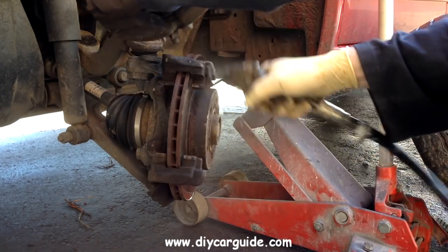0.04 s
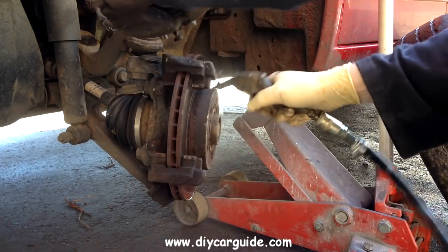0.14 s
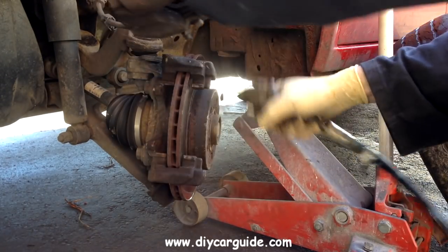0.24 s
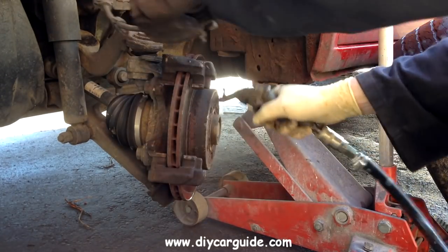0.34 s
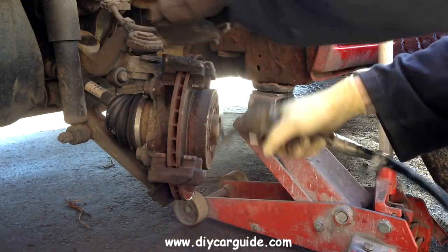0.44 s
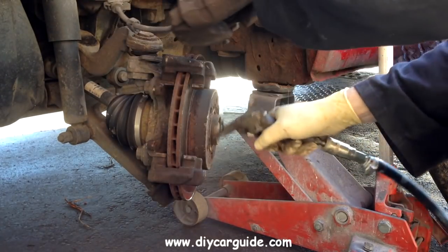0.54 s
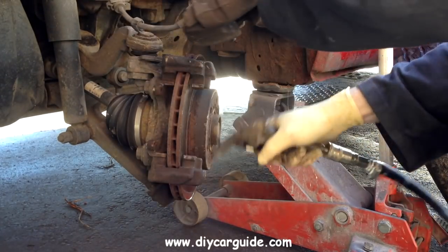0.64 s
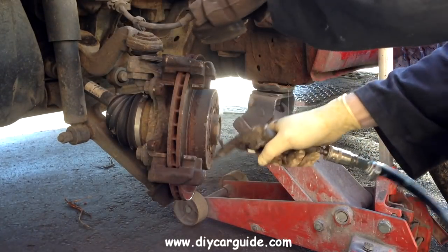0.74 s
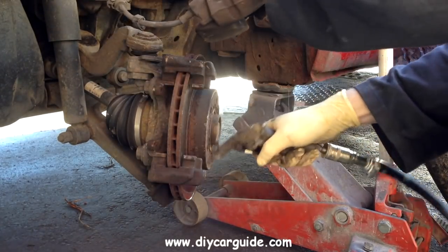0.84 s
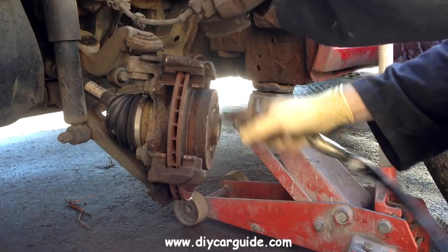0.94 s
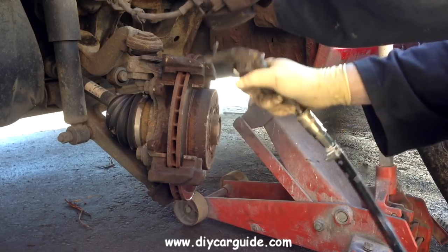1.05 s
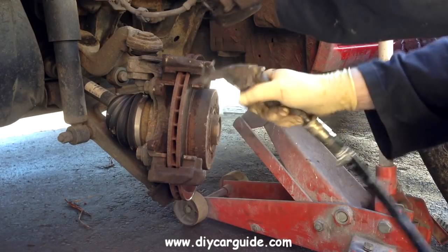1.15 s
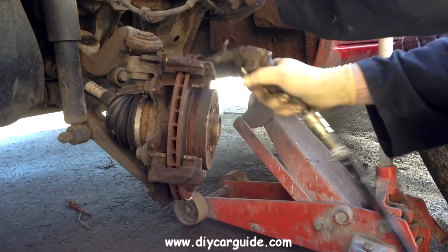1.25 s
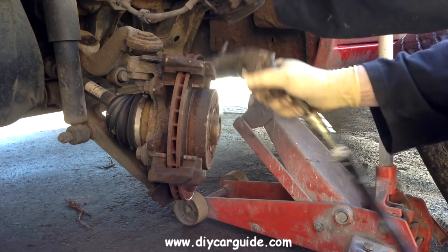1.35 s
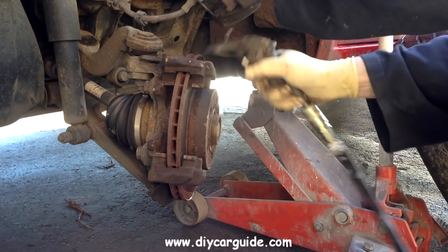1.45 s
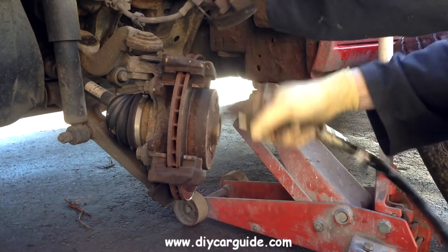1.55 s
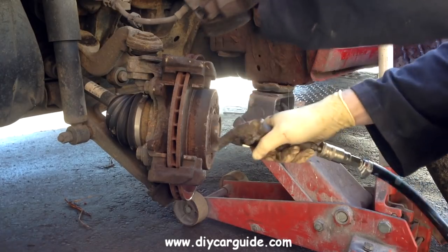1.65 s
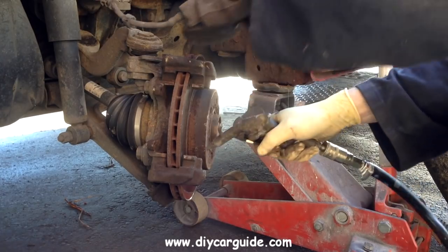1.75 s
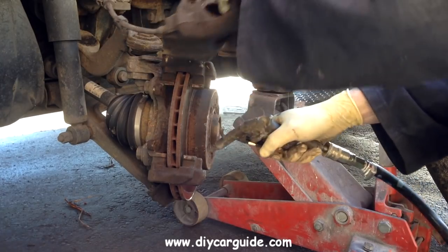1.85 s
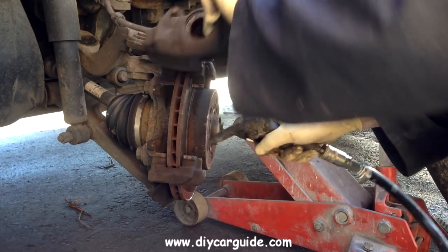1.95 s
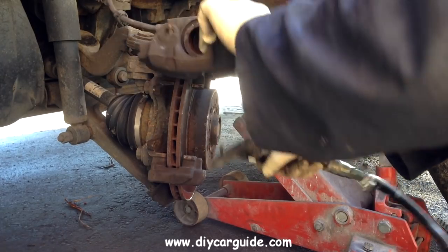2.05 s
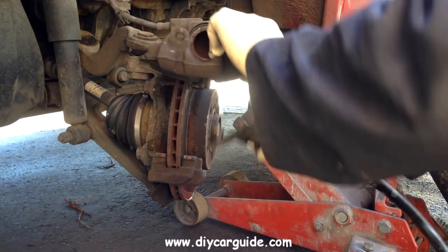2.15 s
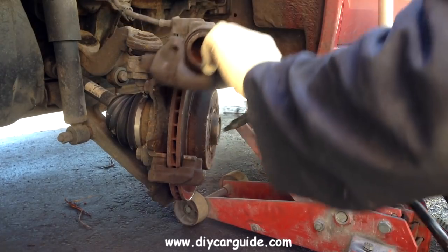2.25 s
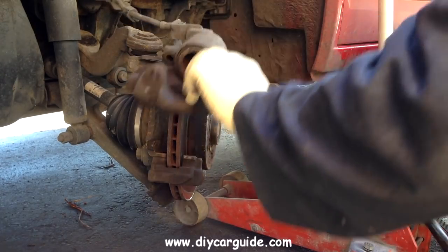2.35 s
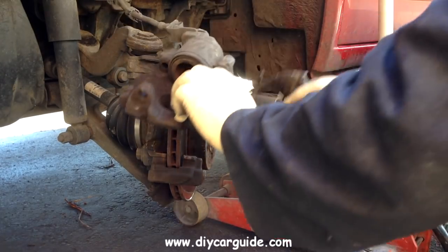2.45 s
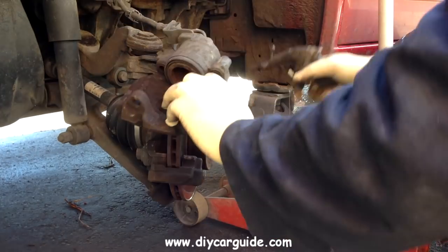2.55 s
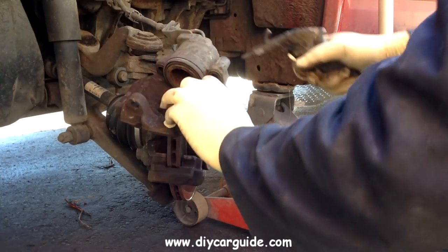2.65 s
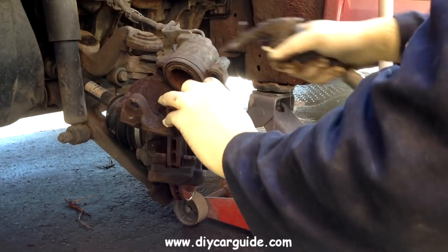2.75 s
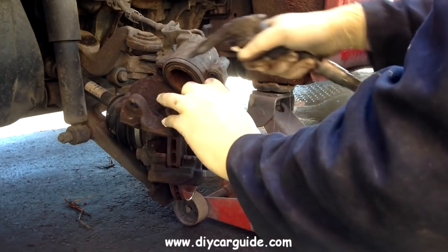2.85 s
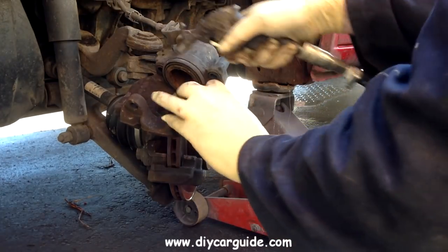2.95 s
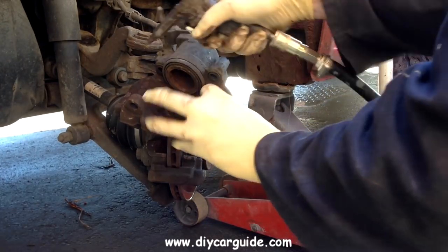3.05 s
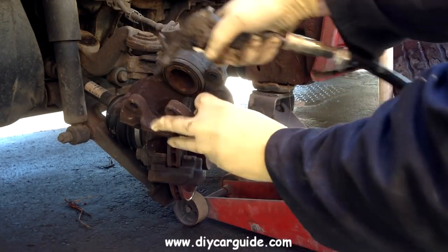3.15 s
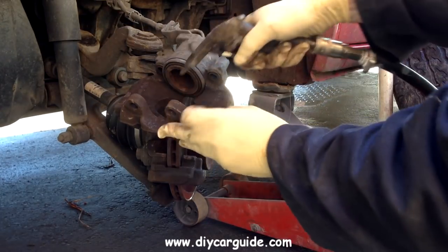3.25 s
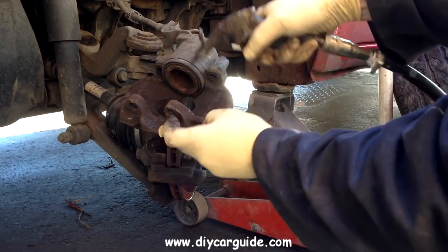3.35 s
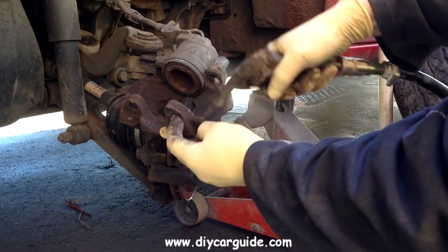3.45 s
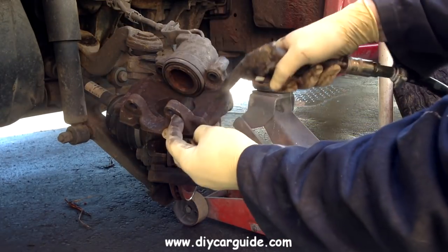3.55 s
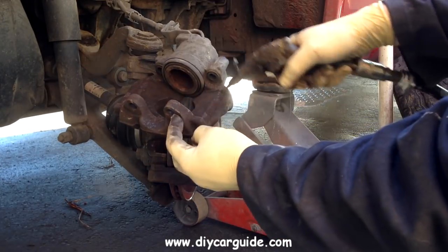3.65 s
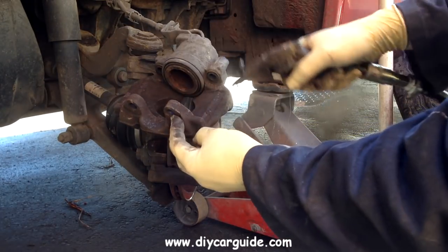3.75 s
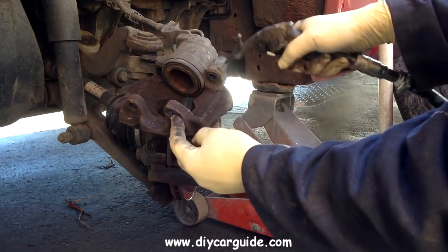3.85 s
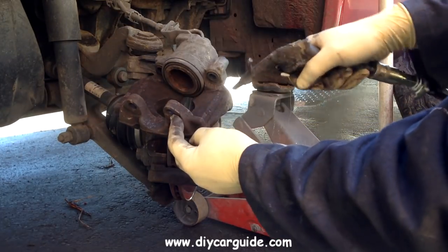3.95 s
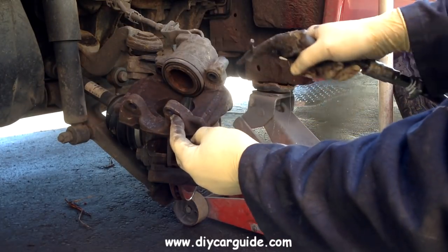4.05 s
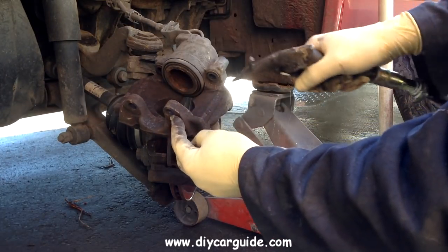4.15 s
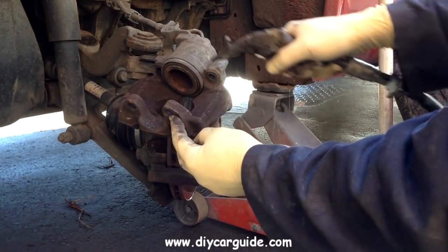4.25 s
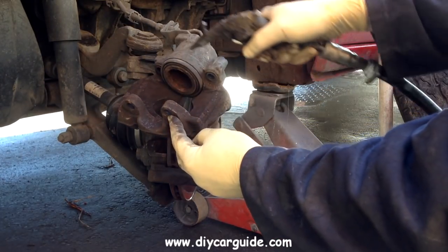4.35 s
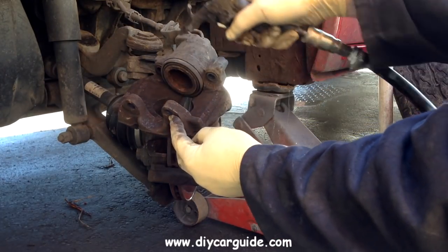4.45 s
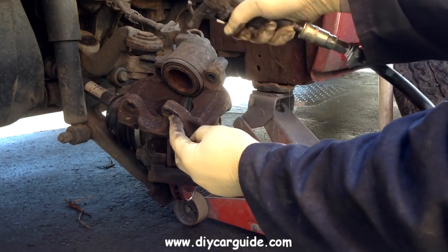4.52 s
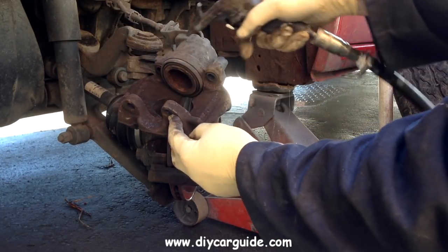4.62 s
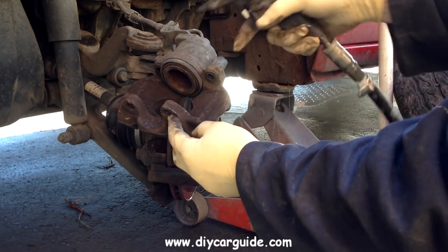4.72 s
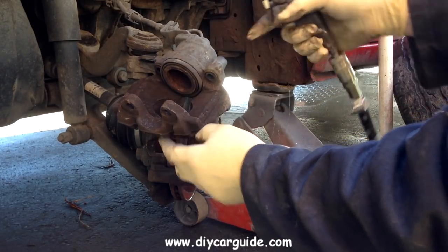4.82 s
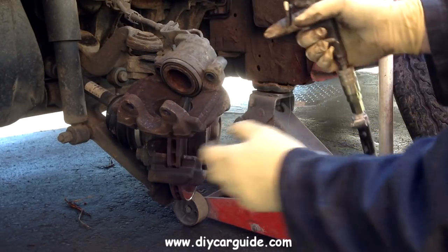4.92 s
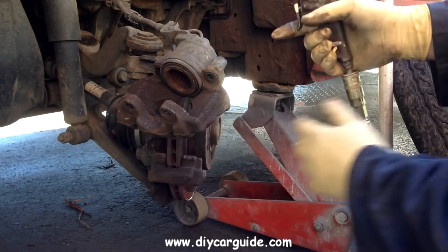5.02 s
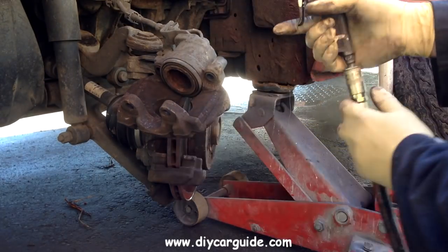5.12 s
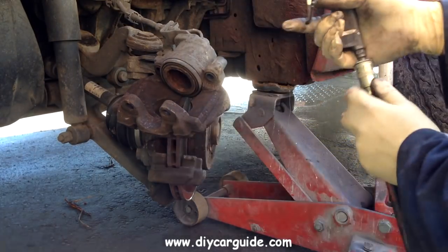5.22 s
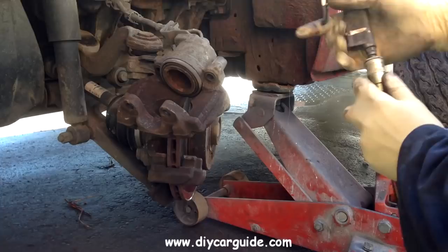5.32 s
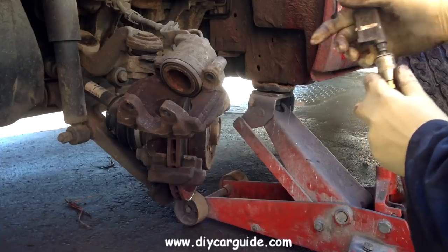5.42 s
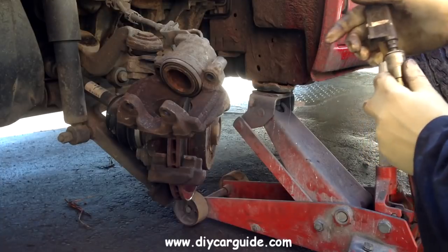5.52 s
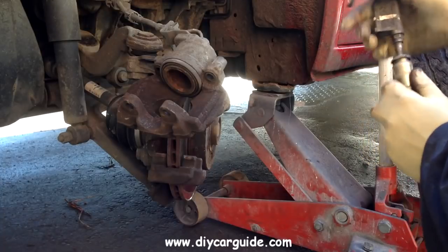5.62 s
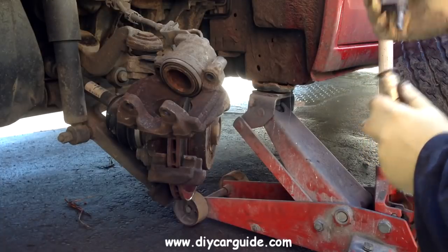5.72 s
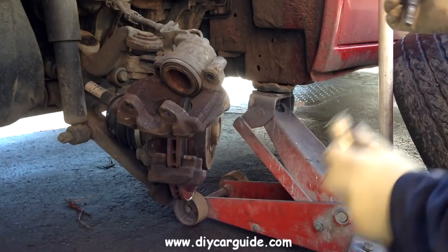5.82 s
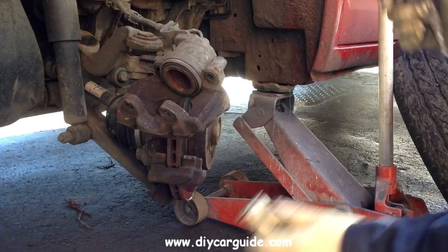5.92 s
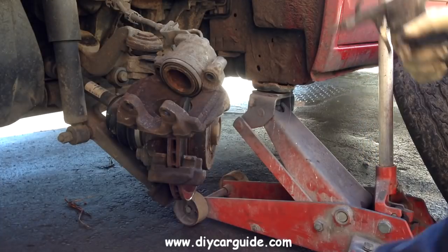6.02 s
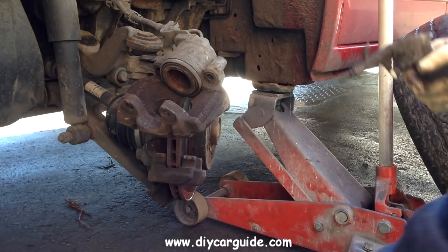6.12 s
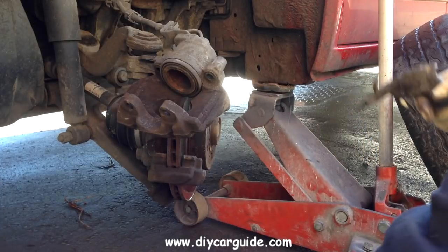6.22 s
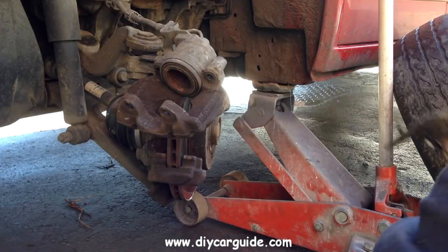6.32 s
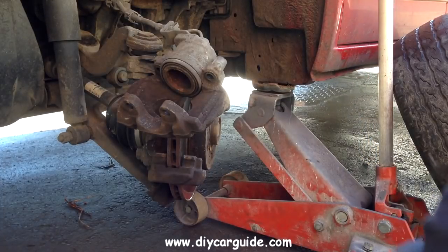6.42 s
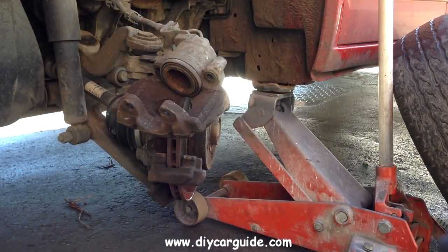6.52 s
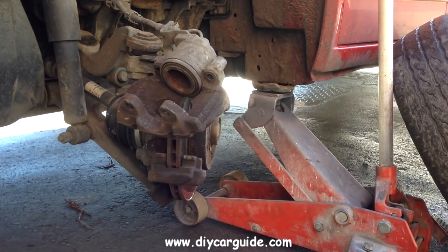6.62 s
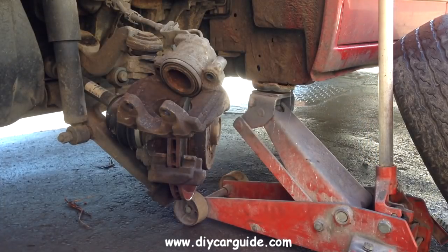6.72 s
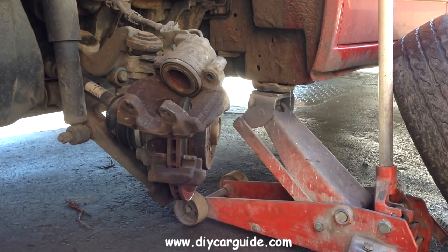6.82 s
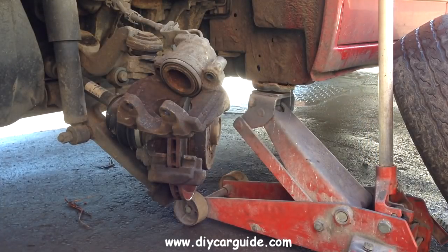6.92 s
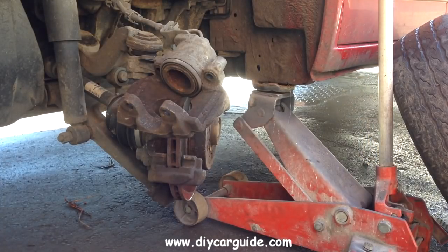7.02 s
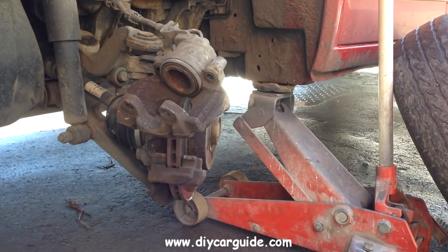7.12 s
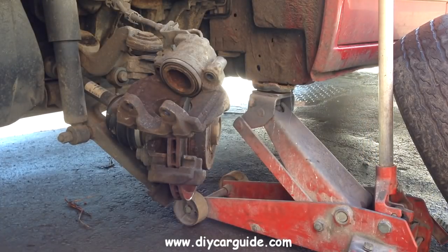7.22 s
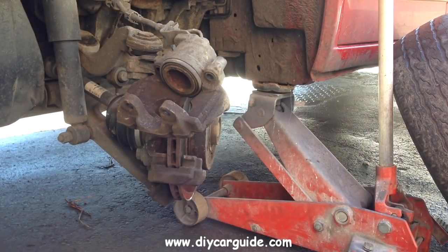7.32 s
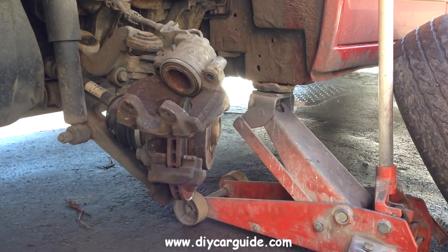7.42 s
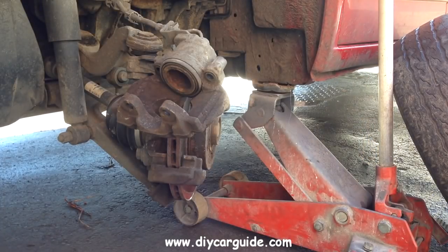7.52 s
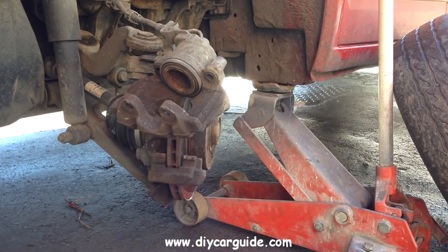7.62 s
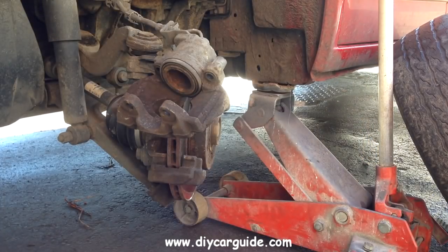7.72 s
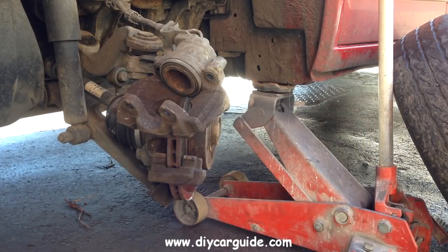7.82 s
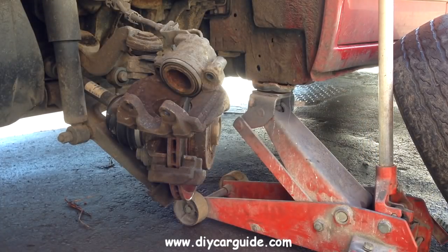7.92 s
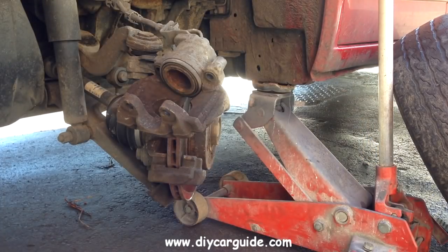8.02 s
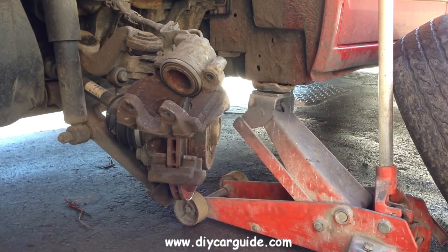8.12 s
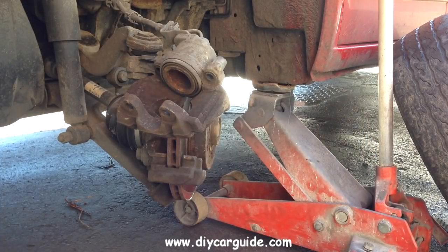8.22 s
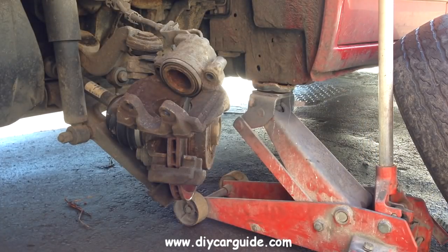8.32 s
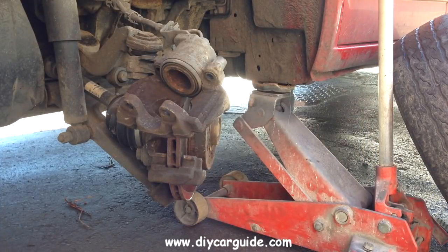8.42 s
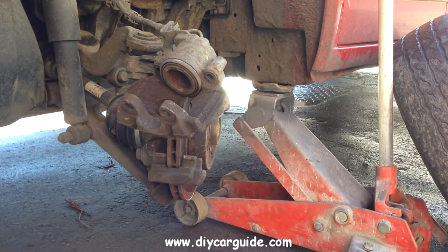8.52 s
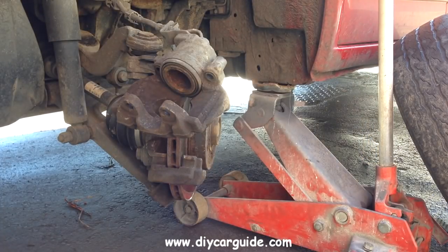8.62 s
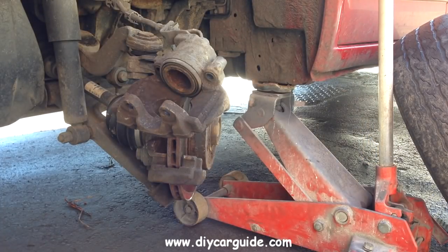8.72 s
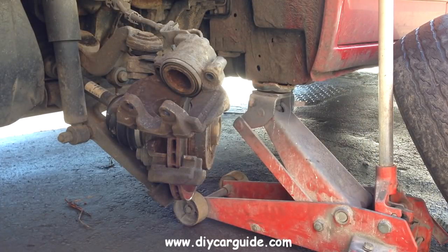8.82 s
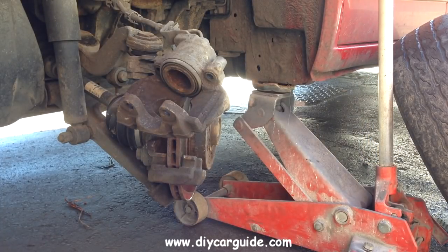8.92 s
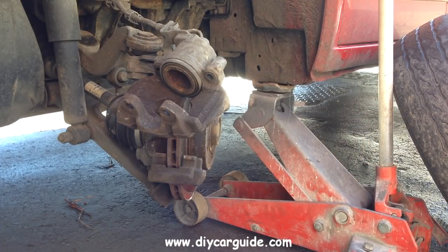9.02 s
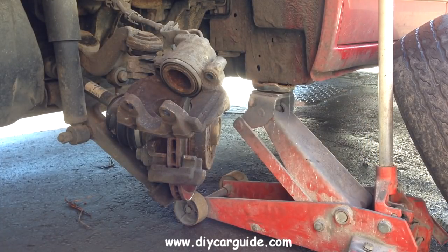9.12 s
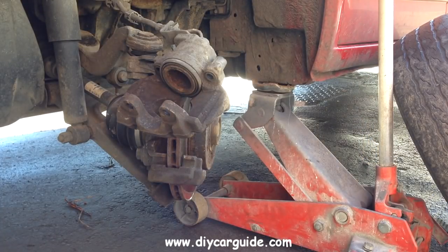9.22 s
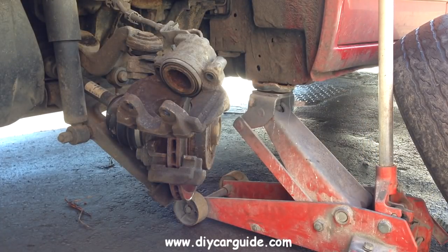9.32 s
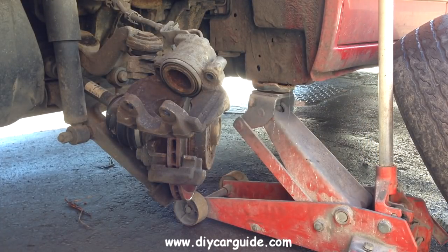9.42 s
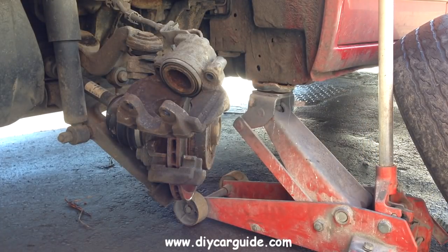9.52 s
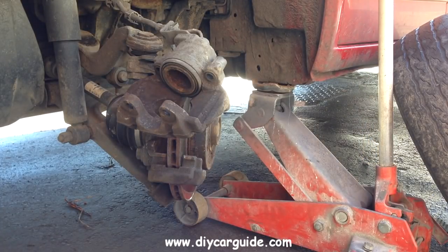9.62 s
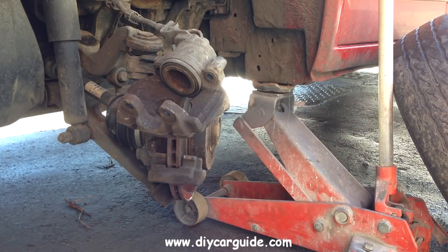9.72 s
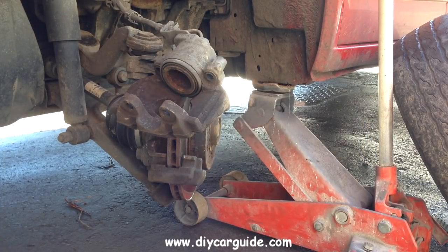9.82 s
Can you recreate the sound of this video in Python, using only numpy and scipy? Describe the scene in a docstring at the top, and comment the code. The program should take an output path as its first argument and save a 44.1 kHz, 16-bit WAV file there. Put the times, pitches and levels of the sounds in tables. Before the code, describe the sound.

From the start, a blow gun hisses loudly and close by, sweeping compressed air over a brake disc under a wheel arch. The bright jet wavers, flares on metal edges, roars in hollows and gives brief howls across slots, over a faint drone and a few dull bumps. It stops at about 2.4 seconds and resumes at 2.6, slightly stronger and more hollow on the caliper, until 4.7.

From about 5 seconds a much quieter piston compressor hum swells in the garage, throbbing and lightly rattling, with two soft, overlapping hoots around 5.3. At 5.7 the hose uncouples with one short, sharp puff. At 6.8 the gun is put down with a bright, dry steel clink, followed by a softer knock at 7.3. The hum grows slightly and runs on steadily until the end, near 10 seconds. The space has little echo.

```python
"""A blow gun sweeps compressed air over a brake disc, pauses, then sweeps the caliper, close by under a
wheel arch. The jet hisses, splashes on metal, howls across slots and bores and roars in hollows, over a
faint drone and a few dull bumps. From about 5 s a piston compressor's hum swells in the garage, with two
soft hoots. The hose uncouples with a sharp puff; the gun is put down with a clink; the hum runs on."""
import sys
import numpy as np
from scipy import signal
from scipy.fft import rfft, irfft, next_fast_len
from scipy.io import wavfile
from scipy.ndimage import uniform_filter1d, map_coordinates

SR = 44100
rng = np.random.default_rng(int(sys.argv[2]) if len(sys.argv) > 2 else 0)


def waveform_to_disk(signal):
    """Save audio, clipped to [-1, 1], as 16-bit WAV at the path in sys.argv[1]."""
    frames = np.transpose(np.atleast_2d(signal))
    scaled = np.clip(frames, -1, 1) * 32767
    samples = np.round(scaled).astype(np.int16)
    wavfile.write(sys.argv[1], SR, samples)


N = 434826
T = np.arange(N) / SR

# trigger pulls: open t/s, close t/s, flow level/dB
TRIGGER_PULLS = [(-0.05, 2.382, -28), (2.611, 4.684, -26)]
# nozzle turning towards and away from the listener, with the trigger briefly eased near 3.9 s: t/s, hiss
# gain/dB
NOZZLE_AIM = [(0.0, 4), (0.32, -2), (0.42, 3.5), (0.83, 1), (1.18, 2), (1.27, 6), (1.6, 0), (1.79, 3.5),
              (2.03, 2), (3.13, -0.5), (3.53, 2), (3.64, 0.5), (3.7, 6.5), (3.86, 2.5), (3.9, -8),
              (3.938, -6.5), (3.96, 1.5), (4.2, 1.5), (4.35, 8), (4.71, 1.5)]
# free jet: f/Hz, level/dB
HISS_SPECTRUM = [(100.0, -32), (700.0, -33.5), (2500.0, -11.5), (4500.0, -3.5), (8000.0, 1), (11000.0, 1.5),
                 (15500.0, -0.5)]
# roar in the disc's hollows: f/Hz, level/dB
DISC_ROAR_SPECTRUM = [(60, -27), (450, -9.5), (950, -5), (1500, -7), (2200, -7), (4000, -26.5)]
# roar in the caliper's hollows: f/Hz, level/dB
CALIPER_ROAR_SPECTRUM = [(60, -26.5), (450, -13), (780, -7.5), (1180, -5), (1400, -16), (1900, -10),
                         (3500, -19)]
# jet dwells in a hollow: enter t/s, leave t/s, level/dB
HOLLOW_DWELLS = [(0.495, 0.545, -39.5), (0.678, 0.71, -34), (1.235, 1.42, -41.5), (1.635, 1.665, -32),
                 (2.068, 2.16, -36.5), (2.266, 2.35, -39.5), (2.618, 2.7, -30.5), (2.904, 3.06, -37.5),
                 (3.155, 3.45, -31.5), (3.76, 3.85, -40.5), (3.95, 4.29, -34), (4.433, 4.487, -29.5),
                 (4.565, 4.67, -31.5)]
# jet hits an edge or face: middle t/s, length/s, level/dB, centre f/Hz (higher when nearer the nozzle)
SPLASHES = [(0.066, 0.044, -15.5, 5460), (0.109, 0.041, -18.5, 4100), (0.25, 0.048, -16.5, 7300),
            (0.514, 0.031, -24.5, 2460), (0.562, 0.036, -23, 3660), (0.702, 0.051, -22, 2800),
            (0.758, 0.066, -22.5, 5550), (0.827, 0.032, -19, 6100), (0.868, 0.086, -20, 3300),
            (0.948, 0.056, -19.5, 7100), (0.983, 0.04, -18.5, 4900), (1.056, 0.026, -16.5, 7500),
            (1.083, 0.059, -23.5, 3300), (1.251, 0.031, -28, 2770), (1.297, 0.027, -21, 3420),
            (1.338, 0.026, -22.5, 3140), (1.673, 0.039, -19, 2620), (1.74, 0.15, -18.5, 6800),
            (1.87, 0.16, -20, 3300), (1.96, 0.062, -17.5, 4300), (2.088, 0.052, -21.5, 3320),
            (2.2, 0.052, -19, 4400), (2.303, 0.075, -24, 4500), (2.698, 0.021, -14.5, 3920),
            (2.731, 0.055, -19, 5500), (2.801, 0.11, -19.5, 8550), (2.914, 0.028, -19.5, 10800),
            (3.239, 0.028, -28.5, 2490), (3.396, 0.042, -18.5, 7400), (3.493, 0.024, -19, 8270),
            (3.567, 0.04, -17, 9830), (3.778, 0.059, -19, 6150), (3.853, 0.019, -15.5, 5280),
            (3.954, 0.029, -19, 5170), (4.069, 0.029, -18, 4940), (4.122, 0.1, -22, 4320),
            (4.171, 0.028, -18, 4370), (4.306, 0.069, -19, 5500), (4.455, 0.041, -25, 3900),
            (4.608, 0.092, -16.5, 6300)]
# air burst: f/centre f, level/dB
BURST_SPECTRUM = [(0.05, -36), (0.35, -9), (0.701, 1), (1.0, 2.5), (1.5, 1.5), (3.0, -6), (6.0, -27)]
# jet crosses a slot or bore: middle t/s, length/s, level/dB, f/Hz
CAVITY_HOWLS = [(0.095, 0.065, -26, 2420), (0.256, 0.042, -25, 3960), (1.077, 0.039, -27, 2600),
                (1.255, 0.026, -28, 2570), (1.335, 0.075, -27.5, 2520), (1.413, 0.04, -30.5, 2415),
                (1.669, 0.027, -28, 2310), (2.917, 0.026, -30, 1170), (3.403, 0.06, -24.5, 1170),
                (3.84, 0.043, -29.5, 1166), (3.886, 0.025, -32, 3400), (3.975, 0.028, -29, 1160),
                (4.207, 0.043, -30, 1100), (4.27, 0.052, -23.5, 1164), (4.458, 0.035, -26.5, 3450),
                (4.626, 0.022, -18.5, 3500)]
# modes of disc and wheel arch: f/Hz, level/dB
DISC_ARCH_MODES = [(950, 1), (1560, -4), (1830, 0.5), (2350, 0), (2640, -4), (2930, -10.5), (3300, -5),
                   (4280, -3)]
# modes of caliper and wheel arch: f/Hz, level/dB
CALIPER_ARCH_MODES = [(1520, 5.5), (1860, 0.5), (2720, -3), (3310, -4.5), (3590, -2.5), (6550, -12)]
# dull knocks: t/s, level/dB, peak f/Hz, t60/s
DULL_BUMPS = [(1.485, -31, 188.6, 0.15), (1.965, -38, 131, 0.78), (2.365, -30.5, 120, 0.36),
              (5.249, -38.5, 174, 0.8), (7.294, -26, 1140, 0.096)]
# compressor swell: t/s, level/dB, gain of side lines and clatter/dB
COMPRESSOR_SWELL = [(4.85, -77, 16), (5.19, -44, -2), (5.45, -32, -11), (5.7, -35.5, -2), (6.1, -34.5, 0.5),
                    (7.6, -31.5, 0), (8.2, -30.5, -0.7)]
# compressor lines: f/stroke rate, level/dB
PUMP_LINES = [(3, -17.5), (5, -10.5), (6, -14.5), (7, -18.5), (9, -2), (10, -7.5), (12, -8.5), (15, -18),
              (16, -15), (21, -16), (24, -18), (26, -10), (27, -18.5), (28, -24), (35.5, -20)]
# compressor air and mechanical noise: f/Hz, level/dB
RUSH_SPECTRUM = [(30, -19.5), (200, -14.5), (550, -18), (1000, -21.5), (1900, -25), (3230, -30.5),
                 (8950, -43), (15500, -53)]
# compressor whines: f/Hz, width/Hz, level/dB
WHINE_BANDS = [(2100, 30, -28), (3240, 60, -29), (5150, 59.5, -36.5), (8730, 160, -35.5)]
# hoots as the hum rises: middle t/s, length/s, f/Hz, level/dB
SOFT_HOOTS = [(5.205, 0.34, 670, -45), (5.332, 0.38, 361.3, -41.5)]
# air leaving the coupling: t/s, level/dB, t60/s, centre f/Hz
COUPLING_PUFFS = [(5.653, -17, 0.06, 8500), (5.6577, -9, 0.027, 5600), (5.662, -11, 0.032, 2840),
                  (5.675, -25, 0.05, 3980)]
# modes of the hose fitting: f/Hz, level/dB, t60/s
FITTING_MODES = [(119, -27.5, 0.19), (390, -14.5, 0.036), (1076, -11, 0.024), (1397, -15, 0.034)]
# metal parts knock: t/s, level/dB, ring gain/dB
METAL_KNOCKS = [(6.036, -39.5, -19), (6.7989, -18.5, -7), (6.807, -33, -11), (7.296, -32.5, -19)]
# their mode clusters: f/Hz, level/dB, t60/s
STEEL_MODES = [(3120, 3.5, 0.056), (8100, 0, 0.08), (9320, 7, 0.12), (11800, -7, .05)]

VALVE_OPEN_S, VALVE_T60_S = 0.016, 0.19
TO_CALIPER_S = 2.56  # between the pulls
STROKE_HZ, MAIN_LINE, VALVE_LINES_ABOVE = 38.11, 9, 20  # lines as f/stroke rate


def undb(db):
    """Decibels to gain."""
    return 10 ** (np.asarray(db) / 20)


def unit(x):
    """Scale to rms 1."""
    return x / np.sqrt(np.mean(x ** 2))


def noise(spectrum, size=N):
    """Noise of rms 1 shaped by (f/Hz, level/dB) points, rolled off below 30 Hz."""
    hz, db = np.transpose(spectrum)
    n = next_fast_len(size)
    f = np.maximum(np.arange(n // 2 + 1) * SR / n, 1)
    gain = undb(np.interp(np.log(f), np.log(hz), db)) * f ** 2 / (f ** 2 + 30 ** 2)
    return unit(irfft(rfft(rng.standard_normal(n)) * gain, n)[:size])


def air_noise(centre_hz, size=N):
    """Broad turbulence band of rms 1."""
    return noise([(centre_hz * k, db) for k, db in BURST_SPECTRUM], size)


def resonance(f, hz, width_hz):
    """Complex response of one mode, gain 1 at its centre."""
    return 1 / (1 + 2j * (f - hz) / width_hz)


def ringing(hz, width_hz, size=N):
    """Noise of rms 1 in one resonance."""
    n = next_fast_len(size)
    f = np.arange(n // 2 + 1) * SR / n
    return unit(irfft(rfft(rng.standard_normal(n)) * resonance(f, hz, width_hz) ** 2, n)[:size])


def walk(rate_hz):
    """Random steps, smoothed twice; rms 1."""
    k = max(int(SR / rate_hz), 1)
    steps = np.repeat(rng.standard_normal(N // k + 1), k)
    return unit(uniform_filter1d(uniform_filter1d(steps, k), k)[:N])


def decay(t, t60_s):
    """Envelope falling 60 dB in t60_s."""
    return np.exp(-np.log(1000) * t / t60_s)


def held(rows, rise_s, t60_s):
    """Attack, hold and release per (start t/s, end t/s, level/dB) row."""
    return sum(undb(db) * np.clip((T - start) / rise_s, 0, 1) * decay(np.maximum(T - end, 0), t60_s)
               for start, end, db in rows)


def flare(middle_s, length_s):
    """Times and rounded envelope of the jet passing a spot."""
    start_s = max(middle_s - 2 * length_s, 0)
    t = start_s + T[:int(2 * SR * (middle_s - start_s))]
    return t, 1 / (1 + (2 * (t - middle_s) / length_s) ** 4)


def add(track, start_s, sound):
    """Mix a sound into the track."""
    i = int(start_s * SR)
    track[i:i + len(sound)] += sound[:N - i]


def jet(sway_db=1.65, spill_db=-19.5, flutter_db=2.5):
    """The nozzle hisses; some air always spills into hollows, and aimed into one it roars and flutters."""
    flow = held(TRIGGER_PULLS, VALVE_OPEN_S, VALVE_T60_S)
    aim_db = np.interp(T, *np.transpose(NOZZLE_AIM)) + sway_db * walk(30)
    hiss = flow * undb(aim_db) * noise(HISS_SPECTRUM)
    hollow = np.where(T < TO_CALIPER_S, noise(DISC_ROAR_SPECTRUM), noise(CALIPER_ROAR_SPECTRUM))
    drive = undb(spill_db) * flow + held(HOLLOW_DWELLS, rise_s=0.02, t60_s=0.21)
    roar = drive * undb(flutter_db * walk(90)) * hollow
    return hiss + roar + flow * grazing()


def grazing(disc_db=-16, caliper_db=-30, spread_db=6.5):
    """The jet's edge brushes small ridges at random: faint gusts, stronger on the vaned disc."""
    level_db = np.where(T < TO_CALIPER_S, disc_db, caliper_db)
    return undb(level_db + spread_db * walk(40)) * air_noise(centre_hz=3300)


def splashes(trim_db=0.34, bounce=0.41, gap_lag_s=0.0018, drift_per_s=1.0):
    """The jet flares on metal; two echoes in the changing gap comb each flare differently."""
    out = np.zeros(N)
    for middle_s, length_s, db, hz in SPLASHES:
        t, swell = flare(middle_s, length_s)
        air = air_noise(hz, len(t))
        lags_s = gap_lag_s * rng.uniform(0.301, 2, size=(2, 1))
        drift = np.exp(drift_per_s * rng.standard_normal() * (t - middle_s))
        echoes = sum(np.interp(t - lag_s, t, air) for lag_s in lags_s * drift)
        add(out, t[0], undb(db) * swell * unit(air + bounce * echoes))
    return out * undb(trim_db)


def mirror(x, bounce=0.19, mean_lag_s=0.00071, wander=0.365):
    """The brake reflects the hiss; the lag shifts as the gun waves about."""
    lag_s = mean_lag_s * np.exp(wander * walk(9))
    echo = map_coordinates(x, [np.arange(N) - lag_s * SR], order=1)
    return (x + bounce * echo) / np.hypot(1, bounce)


def howls(width_ratio=0.23, spurt_db=2.5, octave_db=-3, twelfth_db=-12):
    """Turbulence rings cavities in spurts; open disc slots add an octave, closed bores a twelfth."""
    out = np.zeros(N)
    for middle_s, length_s, db, hz in CAVITY_HOWLS:
        t, swell = flare(middle_s, length_s)
        multiple, overtone_db = (2, octave_db) if middle_s < TO_CALIPER_S else (3, twelfth_db)
        low, high = (ringing(k * hz, k * width_ratio * hz, len(t)) for k in (1, multiple))
        add(out, t[0], undb(db) * swell * (low + undb(overtone_db) * high))
    return undb(spurt_db * walk(130)) * out


def arch(x, modes, width_ratio=0.028):
    """Brake part and wheel arch ring along and colour the blown air."""
    n = next_fast_len(N)
    f = np.arange(n // 2 + 1) * SR / n
    gain = 1 + sum(undb(db) * np.abs(resonance(f, hz, width_ratio * hz)) ** 2 for hz, db in modes)
    return irfft(rfft(x, n) * gain, n)[:N]


def garage(x, wet_db=-22, t60_s=0.29):
    """The open garage adds a short, dull tail."""
    t = T[:SR // 2]
    tail = noise([(100, -2), (2000, -1), (15000, -16)], len(t)) * decay(t, t60_s) * (t > 0.005)
    return x + undb(wet_db) * signal.fftconvolve(x, tail / np.linalg.norm(tail))[:N]


def drone(phase_rad, tone_db=-57, rumble_db=-50.5):
    """The compressor's lowest line and a rumble fade in at the start and stay."""
    tone = undb(tone_db + 2 * walk(6.4)) * unit(np.sin(phase_rad))
    rumble = undb(rumble_db) * noise([(30, -16.5), (70, -8), (200, -16), (2000, -28), (15000, -47.5)])
    return np.minimum(0.085 + T / 0.5, 1) * (tone + rumble)


def bumps(rise_s=0.0077, loose_db=1.5):
    """Heavy parts and the hose are moved: soft, loose rumbles."""
    out, t = np.zeros(N), T[:SR // 2]
    attack = 1 - np.exp(-t / rise_s)
    for start_s, db, hz, t60_s in DULL_BUMPS:
        body = noise([(hz / 4, -13), (hz, 0), (2 * hz, -19), (10 * hz, -50)], len(t))
        add(out, start_s, undb(db) * body * decay(t, t60_s) * attack)
    return out * undb(loose_db * walk(60))


def compressor(rush_db=-12, clatter_db=-15, rattle_depth=0.46, rattle_turns=0.089, throb_depth=0.39,
               body_width_hz=110, scatter_rad=0.67):
    """Two strokes a turn kick the pump body into a stack of lines; valves throb and rattle once a turn."""
    times_s, *columns_db = np.transpose(COMPRESSOR_SWELL)
    level, side_gain = (undb(np.interp(T, times_s, db)) for db in columns_db)
    strokes = np.cumsum(STROKE_HZ * (1 + 0.000504 * walk(3))) / SR
    turns = strokes / 2
    throb = 1 + throb_depth * np.cos(2 * np.pi * turns)
    lines, phases_rad = np.zeros(N), []
    for k, db in PUMP_LINES:
        # the body resonance shifts each line's phase
        body = resonance(k * STROKE_HZ, MAIN_LINE * STROKE_HZ, body_width_hz) ** 2
        phase_rad = 2 * np.pi * k * strokes + np.angle(body) + scatter_rad * rng.standard_normal()
        gain = undb(db) * (1 if k == MAIN_LINE else side_gain)
        lines += gain * (throb if k > VALVE_LINES_ABOVE else 1) * np.sin(phase_rad)
        phases_rad.append(phase_rad)
    clatter = undb(clatter_db) * side_gain * throb * valve_clatter(turns)
    rush = undb(rush_db) * noise(RUSH_SPECTRUM)
    rattle = 1 + rattle_depth * np.exp(-(turns % 1) / rattle_turns)
    return level * (lines + rattle * (rush + clatter + whines())) + drone(phases_rad[0])


def valve_clatter(turns):
    """The valves repeat the same noise every turn."""
    one_turn = noise([(150, -9), (520, -1.5), (1030, 0), (1150, -13), (1450, -1), (1900, -13.5),
                      (3300, -13.5), (12000, -35)], size=2304)
    return np.interp(turns, np.arange(len(one_turn)) / len(one_turn), one_turn, period=1)


def whines():
    """Machine noise in a few narrow resonances."""
    return sum(undb(db) * ringing(hz, width_hz) for hz, width_hz, db in WHINE_BANDS)


def hoots(waver=0.0407):
    """Soft wavering tones swell and fade."""
    out = np.zeros(N)
    for middle_s, length_s, hz, db in SOFT_HOOTS:
        swell = np.cos(np.pi * np.clip((T - middle_s) / length_s, -0.5, 0.5))
        pitch_hz = hz * (1 + waver * walk(120))
        out += undb(db) * swell * unit(np.sin(2 * np.pi * np.cumsum(pitch_hz) / SR))
    return out


def coupling(rise_s=0.00074):
    """Trapped air escapes in quick puffs; with the third the plug jumps free and the fitting rings."""
    out, t = np.zeros(N), T[:SR // 4]
    attack = 1 - np.exp(-t / rise_s)
    for start_s, db, t60_s, hz in COUPLING_PUFFS:
        add(out, start_s, undb(db) * air_noise(hz, len(t)) * decay(t, t60_s) * attack)
    ring = sum(undb(db) * decay(t, t60_s) * np.sin(2 * np.pi * hz * t) for hz, db, t60_s in FITTING_MODES)
    add(out, COUPLING_PUFFS[2][0], attack * ring)
    return out


def clinks(crack_t60_s=0.04, cluster_width_hz=450):
    """Steel knocks: a bright crack and a dry ring of close modes."""
    out, t = np.zeros(N), T[:SR // 3]
    for start_s, db, ring_db in METAL_KNOCKS:
        crack = noise([(1600, 2), (4200, -0.5), (9000, 5), (15000, -12)], len(t)) * decay(t, crack_t60_s)
        ring = sum(undb(mode_db) * decay(t, t60_s) * ringing(hz, cluster_width_hz, len(t))
                   for hz, mode_db, t60_s in STEEL_MODES)
        add(out, start_s, undb(db) * (crack + undb(ring_db) * ring / 2))
    return out


def scene():
    """All sources, same in both channels; the gun's valve gates the splashes."""
    valve = held([(open_s, close_s, 0) for open_s, close_s, _ in TRIGGER_PULLS], VALVE_OPEN_S, VALVE_T60_S)
    blown = mirror(jet() + valve * splashes()) + howls()
    air = np.where(T < TO_CALIPER_S, arch(blown, DISC_ARCH_MODES), arch(blown, CALIPER_ARCH_MODES))
    mono = garage(air + coupling() + clinks() + bumps()) + compressor() + hoots()
    return np.array([mono, mono])


def record(dry, ceiling=1.5, cutoff_hz=15650):
    """Soft peak limiting, then a steep low-pass."""
    lowpass = signal.ellip(10, 0.2, 70, cutoff_hz, fs=SR, output="sos")
    return signal.sosfilt(lowpass, ceiling * np.tanh(dry / ceiling))


dry = scene()
out = record(dry)
waveform_to_disk(out)
```